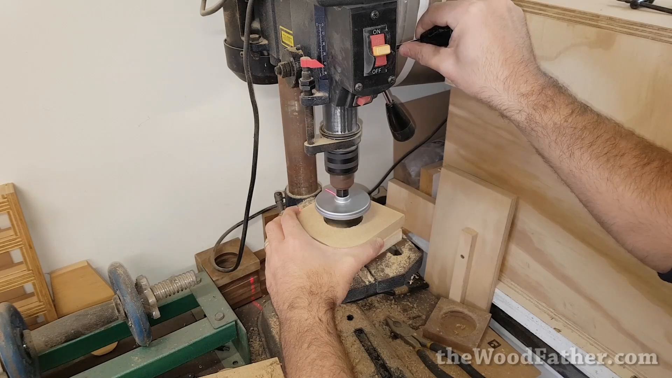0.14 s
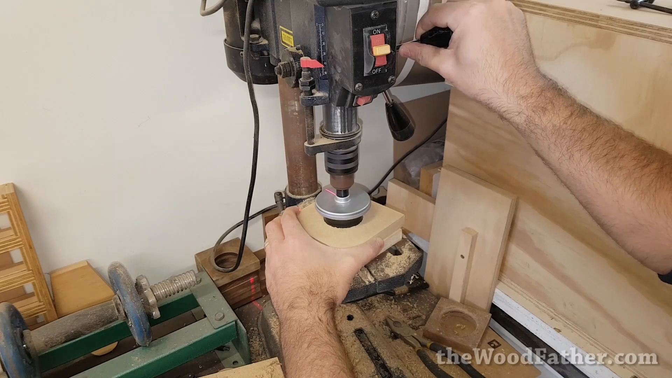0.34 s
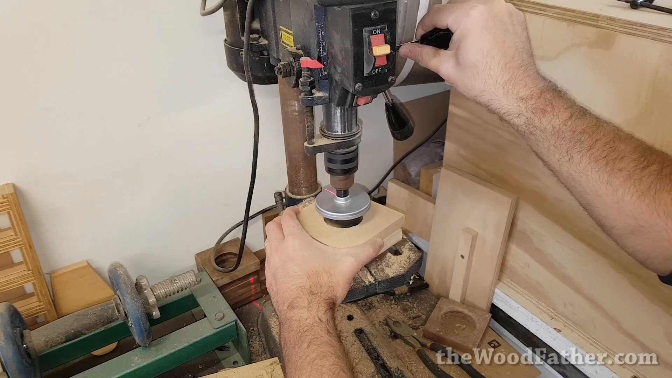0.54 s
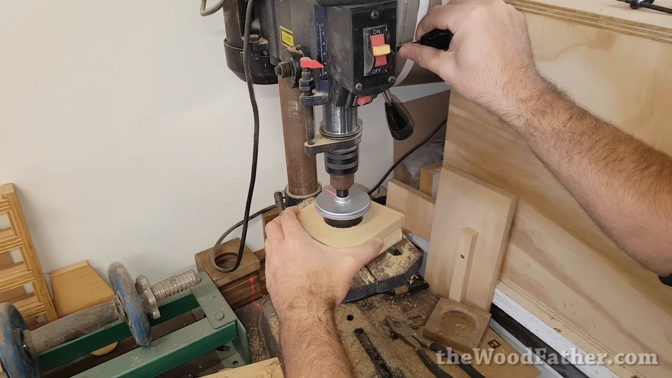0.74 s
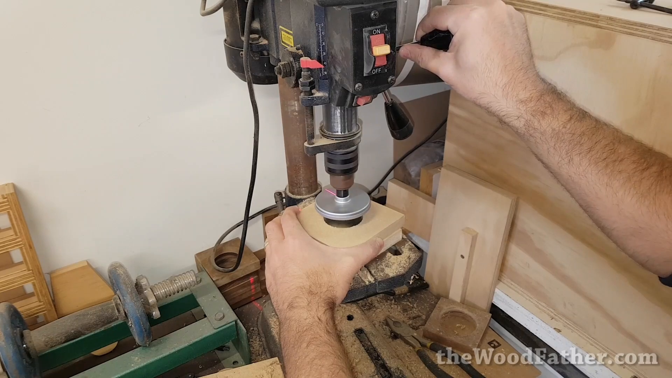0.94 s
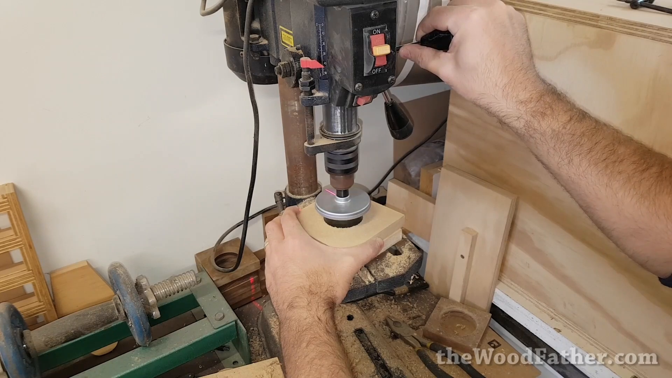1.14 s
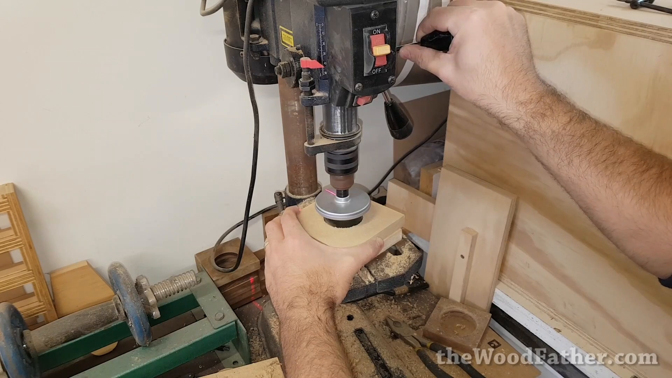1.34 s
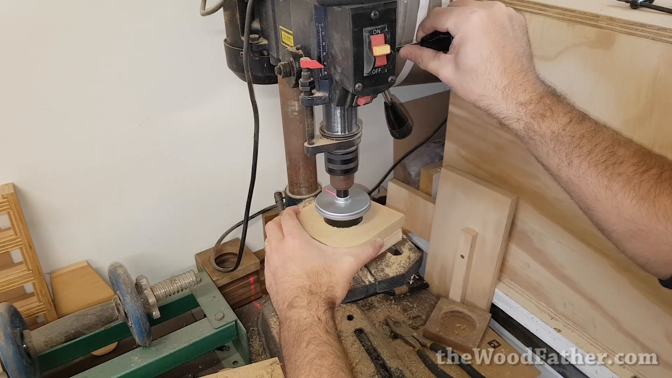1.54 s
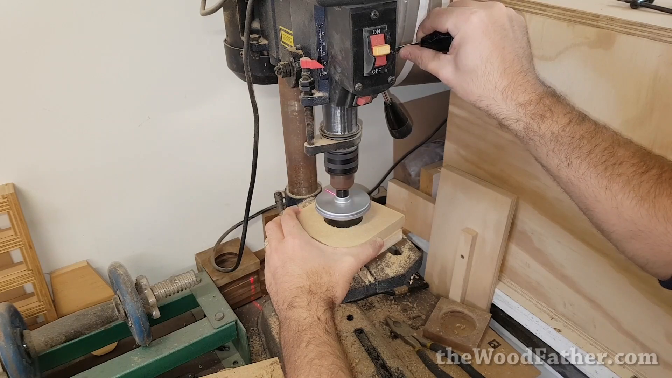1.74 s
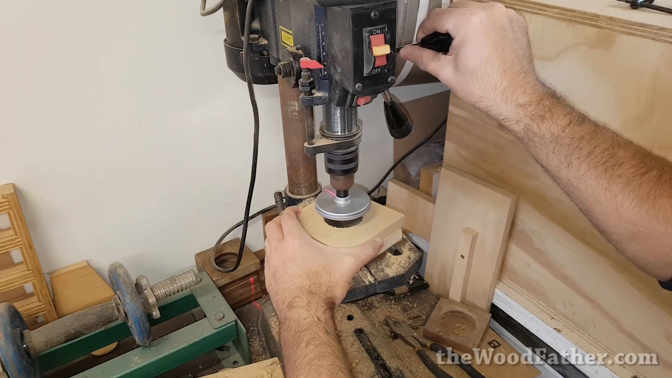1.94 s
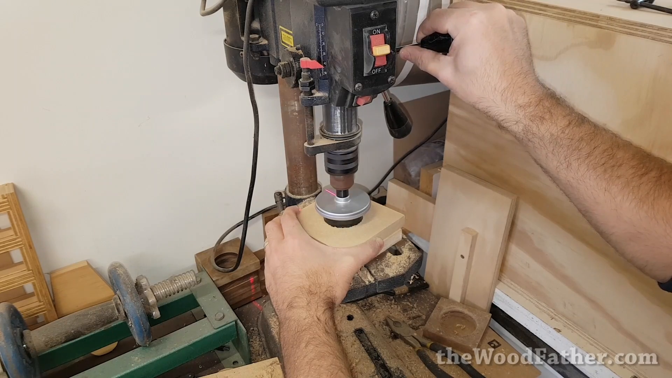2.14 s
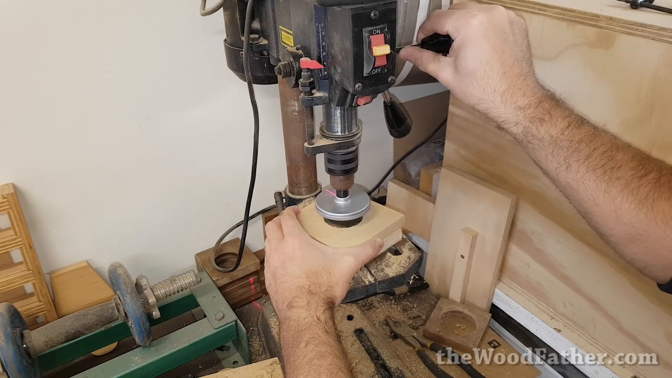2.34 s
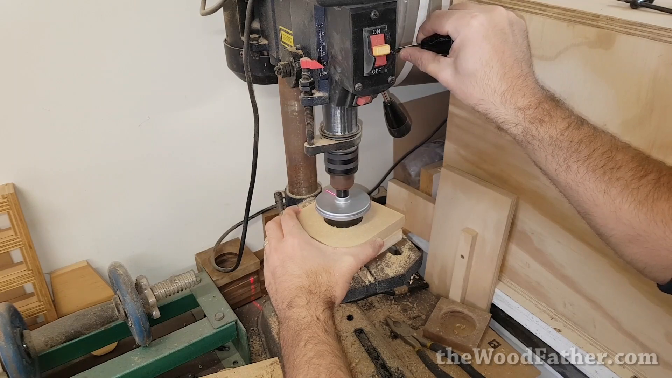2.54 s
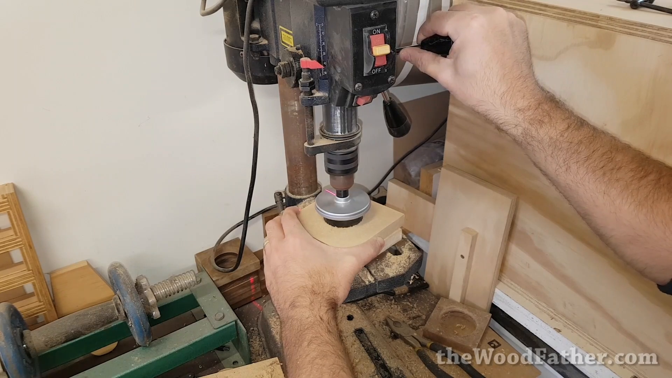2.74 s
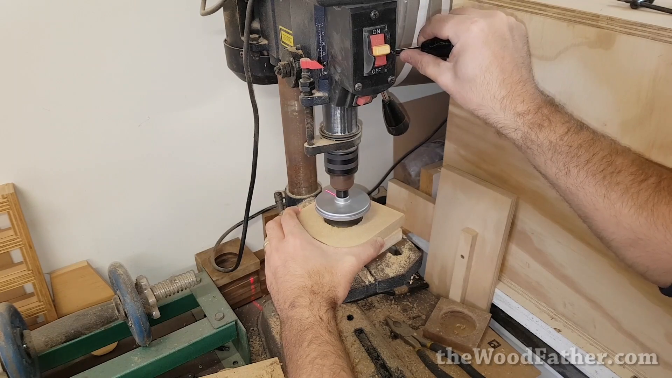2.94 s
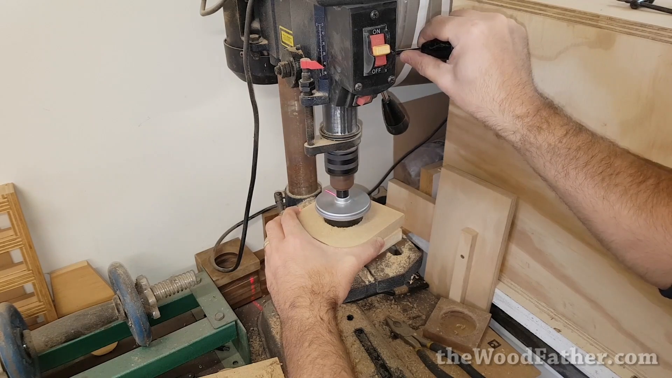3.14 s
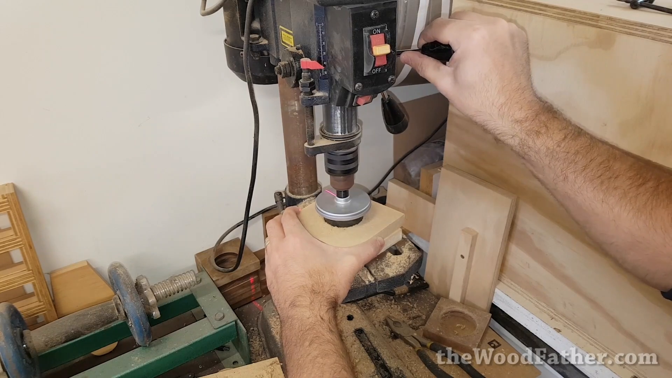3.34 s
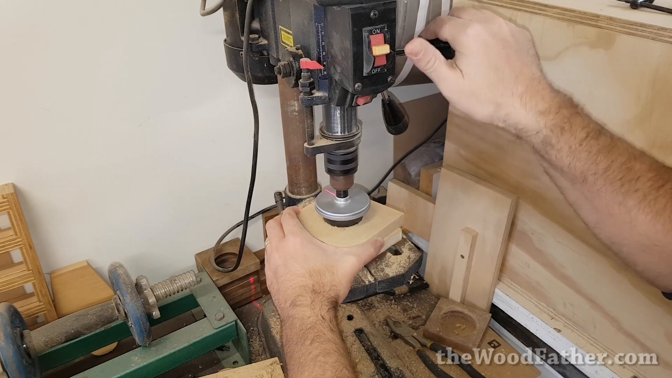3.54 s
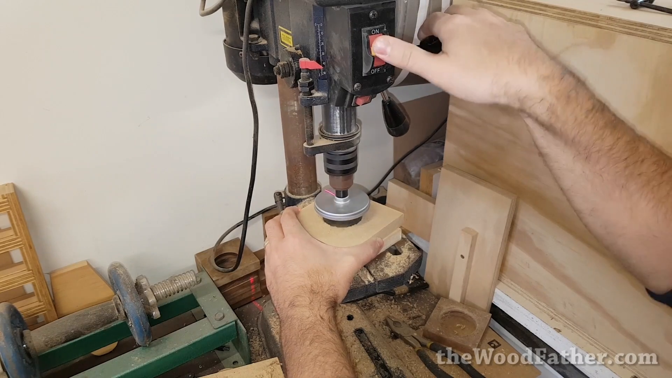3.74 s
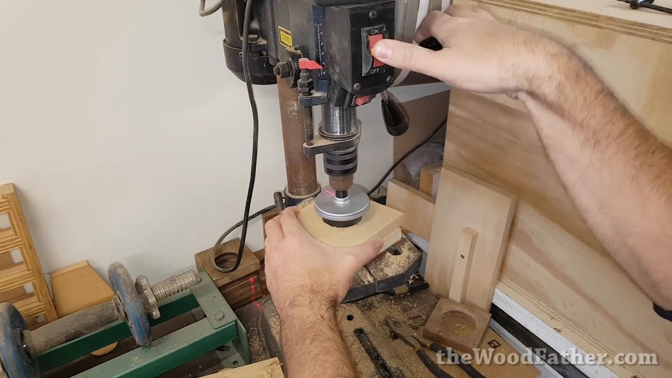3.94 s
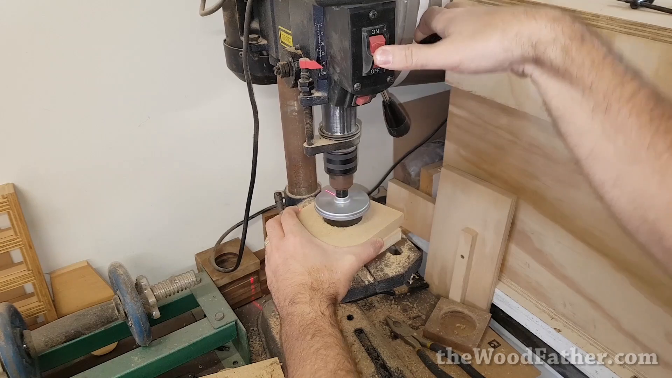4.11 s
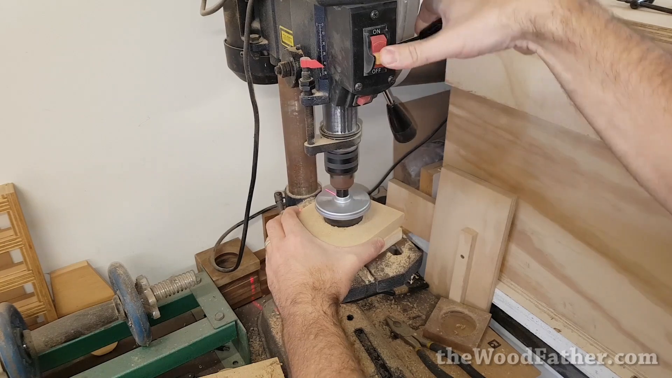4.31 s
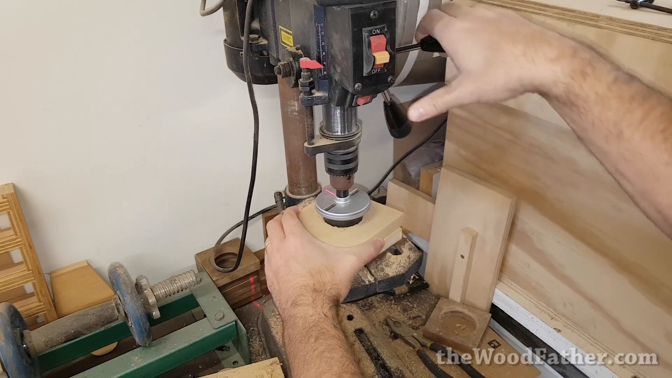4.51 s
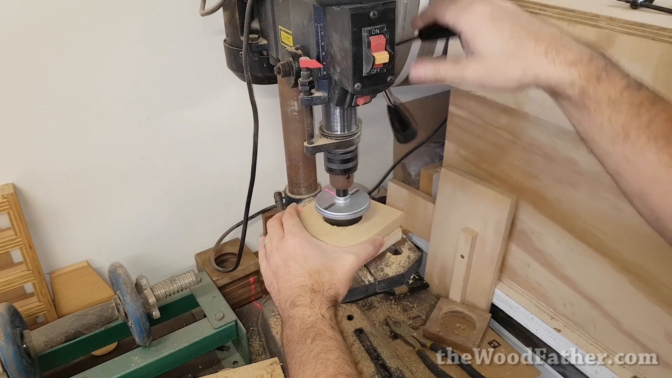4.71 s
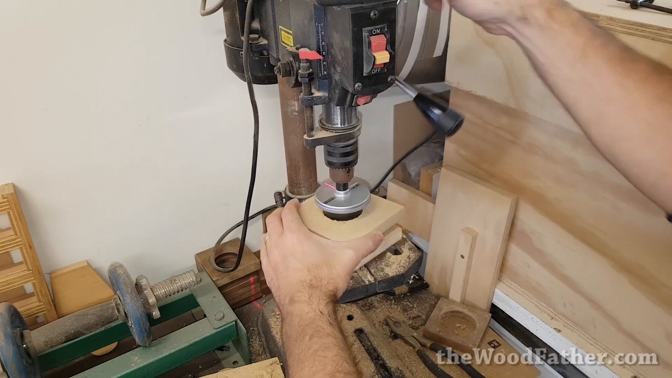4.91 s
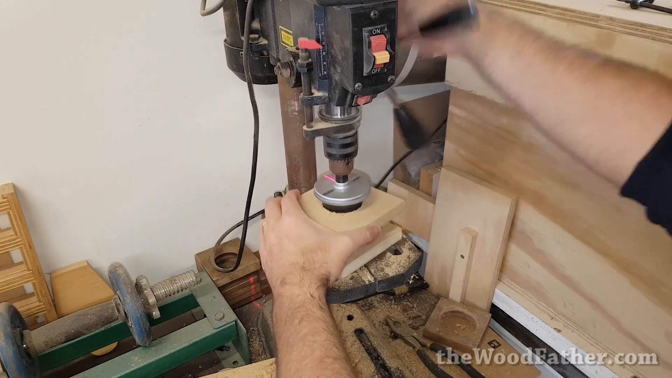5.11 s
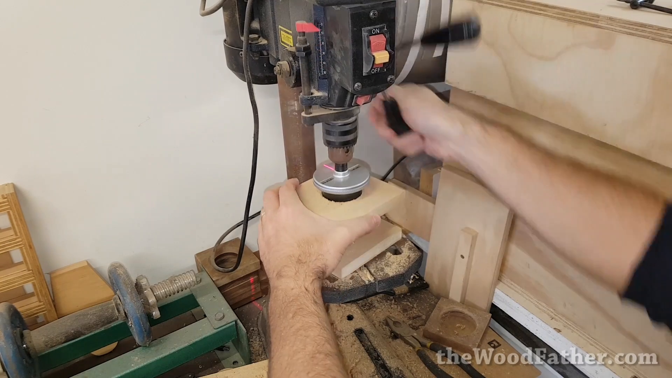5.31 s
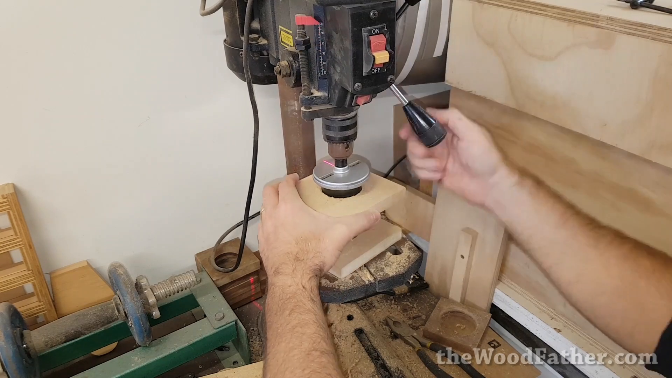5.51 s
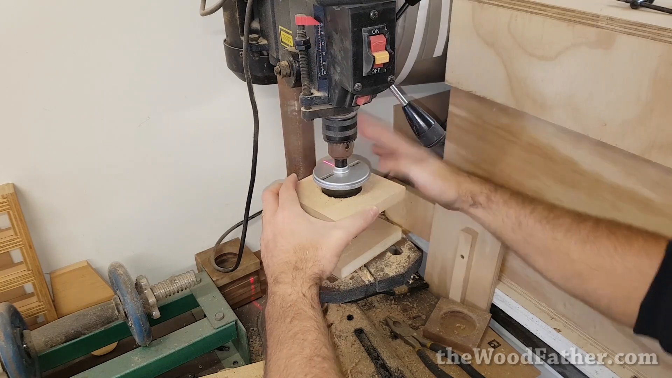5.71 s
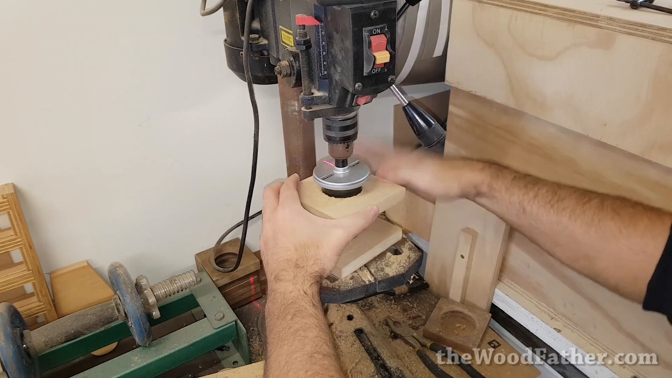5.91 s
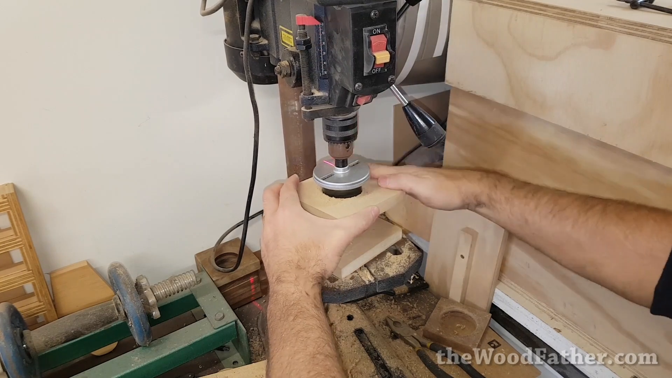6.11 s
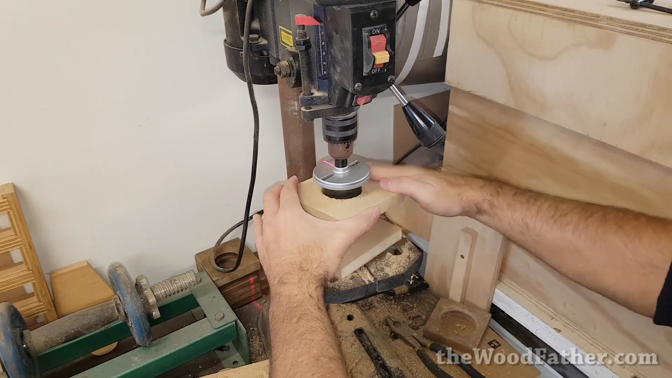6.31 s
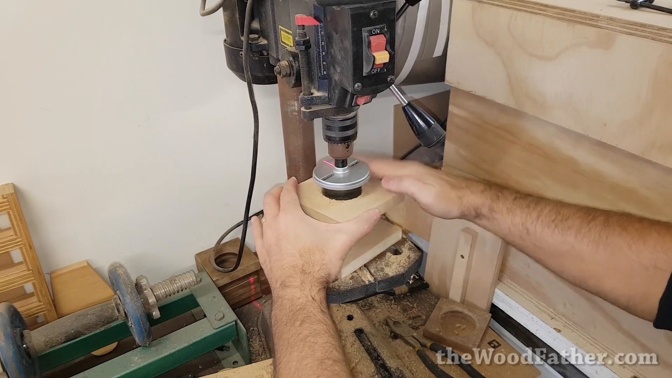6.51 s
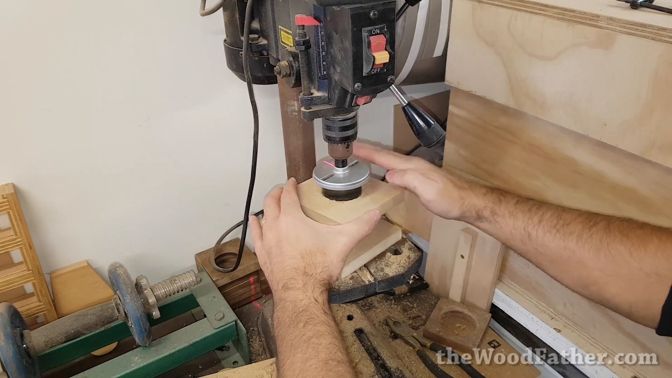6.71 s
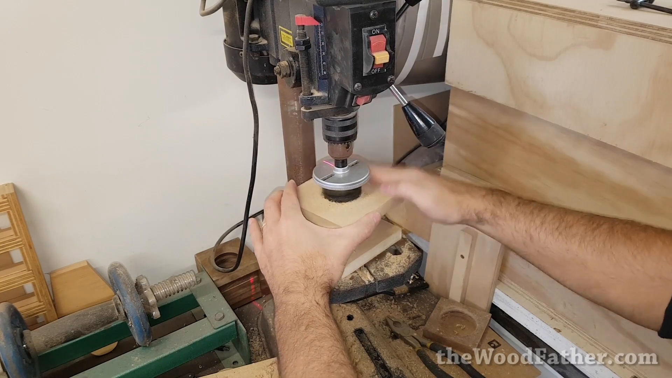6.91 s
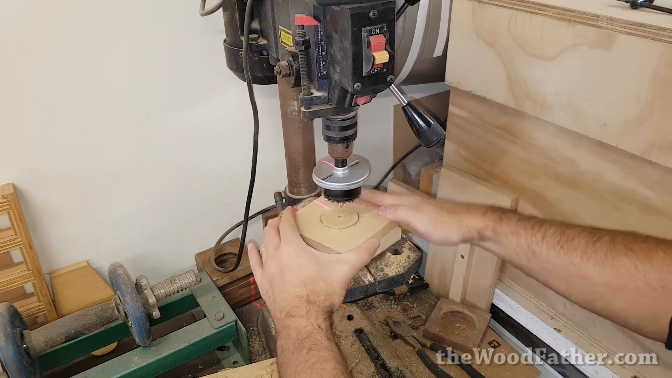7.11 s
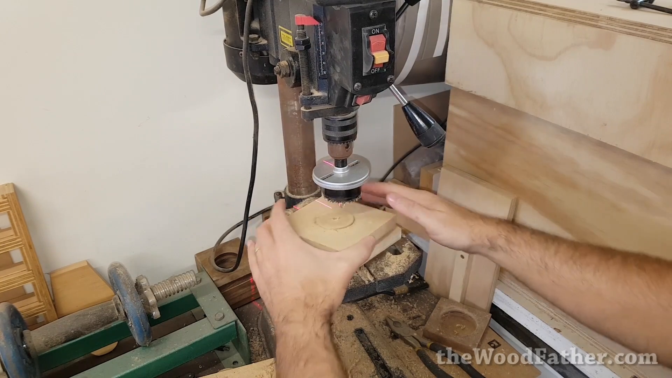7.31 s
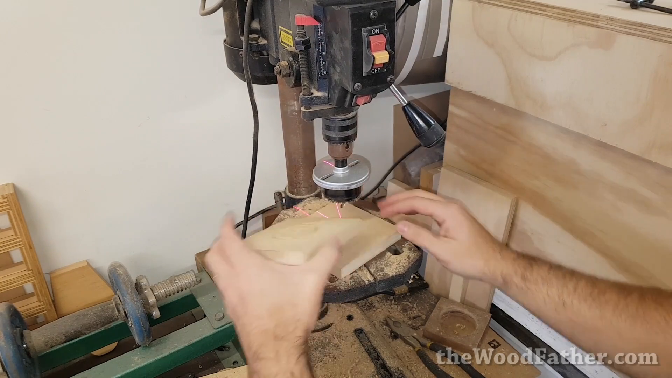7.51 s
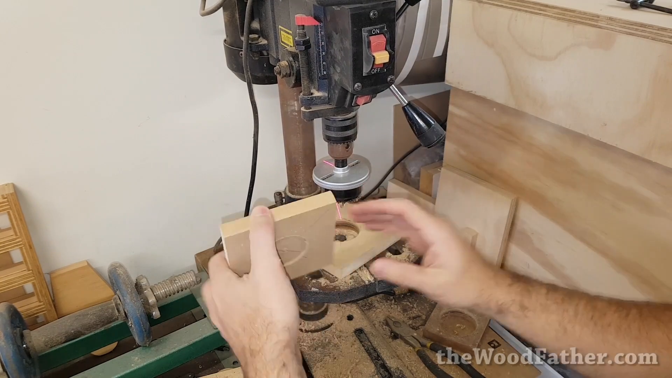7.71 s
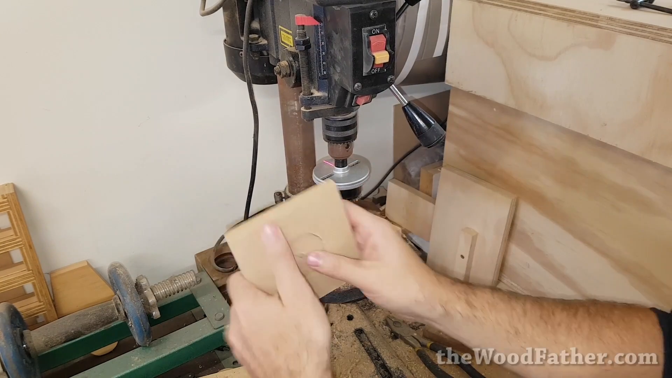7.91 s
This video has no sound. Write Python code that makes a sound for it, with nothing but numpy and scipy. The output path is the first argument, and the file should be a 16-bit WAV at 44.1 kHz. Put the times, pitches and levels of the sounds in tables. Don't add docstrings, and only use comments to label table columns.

```python
import sys
import numpy as np
from scipy import signal
from scipy.fft import rfft, irfft, next_fast_len
from scipy.io import wavfile
from scipy.ndimage import uniform_filter1d, map_coordinates

SR = 44100
rng = np.random.default_rng(int(sys.argv[2]) if len(sys.argv) > 2 else 0)


def ratio(d):
    e = np.asarray(d, float) / 20
    return 10 ** e


def generate_wav(signal):
    frames = np.transpose(np.atleast_2d(signal))
    scaled = np.clip(frames, -1, 1) * 32767
    pcm = np.round(scaled).astype(np.int16)
    wavfile.write(sys.argv[1], SR, pcm)


N = 350595
T = np.arange(N) / SR

BREAKOUT_S, SWITCH_OFF_S, COAST_S, IDLE_END_S = 2.8, 4.134, 0.58, 4.27
LOADED_HZ, FREE_HZ = 176.2, 195.7

# start_s, level_db
FEED = [(0, 3), (.1, 3.5), (.45, 2), (1.17, -1), (1.33, 1), (2.1, -0.5), (2.65, -2.5), (2.76, -3.5),
        (2.82, -7), (3.3, -8), (3.62, -12.5), (3.84, -13.5), (4.15, -13.5)]
# level_db at plain bite, growth_db_per_db of bite, power of speed
PRESS_LAYERS = [
    (-24.5, 0.06, 2.1),
    (-30.5, .6, 2.13),
    (-33, 1, 2.6),
    (-36.5, 0.41, 2.04),
]
# freq_hz, density_db
RUMBLE = [(15, -47), (25, -15), (38, -21.5), (65, -14), (91, -2), (125, -3.5), (188, 7), (330, -15),
          (430, -38.5), (730, -120)]
# freq_hz, density_db
CUT = [(150, -33), (260, -8.5), (430, -7), (506, -6), (565, -4.5), (676, -0.5), (880, -1), (975, -3.5),
       (1080, 0.5), (1230, -4), (2000, -13), (2600, -37), (4400, -120)]
# freq_hz, width_hz, lift_db
BOARD_MODES = [(305.4, 48, 7), (400.5, 28, 7.5), (466, 25, 9), (500, 7.2, 6), (527, 17, 6.5), (620, 20, -1),
               (674, 12, 0.5), (848, 6.2, 1), (1128, 15, 2), (1149, 50, -3.5), (1277, 28, 3.5),
               (1533, 10, 0), (1653, 9.9, 4.5), (1730, 8.4, -10)]
# freq_hz, density_db
RASP = [(940, -43.5), (1600, -6.5), (1780, -8.5), (2260, -6), (3390, -5), (4230, -9.5), (4890, -9.5),
        (5330, -11.5), (7260, -12.5), (8800, -14), (9980, -18), (15100, -21.5), (16000, -35)]
# freq_hz, width_hz, level_db
CUP_MODES = [(3625, 350, 0), (3094, 320, 0)]
# freq_hz, rms_db
LOADED_ORDERS = [(177.6, -31), (323.0, -44.5), (398.4, -43.5), (463.0, -47), (497, -46), (613.7, -49),
                 (673, -48), (851, -52), (1123, -47), (1195, -46), (1280, -47), (1514, -48), (2553, -57)]
# freq_hz, rms_db
FREE_ORDERS = [(95.5, -41), (233, -46.5), (401, -43.5), (499, -50.5)]
# centre_s, rms_db, half_length_s
SURGES = [(0.067, -20, 0.018), (0.26, -26, 0.1), (0.547, -32, 0.0087), (1.325, -28.5, 0.047),
          (1.412, -23.5, 0.022), (1.537, -29, 0.059), (1.825, -25.5, 0.019), (1.901, -27.5, 0.011),
          (1.992, -24, 0.023), (2.196, -33, 0.073), (2.308, -24.5, 0.053), (2.418, -21.5, 0.014),
          (2.53, -29, 0.026), (2.757, -22, 0.028), (3.563, -33, 0.026), (4.072, -34.5, 0.058)]
# start_s, pitch_hz, level_db
SING = [(0, 500, -41), (.3, 500, -35), (.45, 480, -41), (.7, 465, -37), (1.0, 470, -39), (1.2, 500, -40),
        (1.5, 520, -40), (1.9, 500, -40), (2.1, 510, -39), (2.35, 530, -37), (2.6, 490, -38),
        (2.8, 490, -46)]
# centre_s, pitch_hz, level_db, half_length_s
FLARES = [(.2, 672, -39, .2), (.65, 612, -40, .15), (1.35, 684, -39, .25), (.95, 1280, -39, .15),
          (.25, 1200, -40, .15), (.5, 1125, -40, .1), (1.5, 850, -41, .12), (2.33, 1030, -42, .06),
          (1.05, 322, -40, .1), (3.3, 400, -41, .15), (3.87, 405, -40, .06), (3.75, 820, -47, .2),
          (.3, 840, -42, .2), (.2, 1335, -43, .15), (1.8, 1190, -43, .2), (2.0, 780, -44, .15),
          (3.95, 300, -39, .15), (3.9, 520, -43, .15), (.7, 1030, -44, .2)]
# freq_hz, density_db
FLOOR = [(15, -35.5), (25, -2.5), (102, 0.5), (145, -19.5), (256, -2.5), (463, -13), (754, -15),
         (887, -19.5), (9570, -38.5), (13600, -32), (16000, -35)]
# start_s, level_db, pitch_hz
PINGS = [(4.768, -44, 1150), (4.806, -45, 3250), (4.839, -45, 3250), (4.868, -44, 2830), (4.914, -41, 2300),
         (4.925, -46, 3500), (5.011, -48, 3650), (5.048, -44, 3520), (4.896, -36, 3700), (4.752, -43, 1150),
         (5.803, -39, 1320), (5.82, -42, 1350), (3.45, -36, 1300), (7.043, -38, 480), (7.179, -25, 700),
         (5.085, -45, 1900), (5.085, -45, 4650), (5.156, -40, 3600), (4.493, -44, 1800), (4.499, -47, 1200),
         (4.506, -46, 1650), (4.583, -44, 2000), (4.617, -47, 1800), (5.236, -22, 450), (5.143, -27, 450),
         (5.168, -27, 450), (5.435, -47, 5400), (5.084, -39, 3480), (5.113, -39, 3120), (5.137, -42, 3300),
         (5.489, -26, 1880), (5.489, -32, 2650), (3.745, -38, 1500), (6.659, -39, 3150), (6.659, -42, 4200),
         (6.659, -42, 5600), (6.826, -40, 3100), (6.826, -39, 4200), (6.826, -39, 5550), (6.985, -39, 3000),
         (6.988, -40, 1400), (6.858, -30, 260), (7.0560, -14, 3000), (7.0560, -18, 2600), (7.178, -23, 320),
         (7.178, -28, 1100)]
# start_s, level_db, pitch_hz, thud_db, clack_db
KNOCKS = [(3.745, -33, 1480, 3.5, -21), (4.475, -42.5, 1580, 1, -7.5), (4.582, -42, 1960, -5.5, -17),
          (4.614, -50, 1750, -6.5, -16), (5.185, -25.5, 480, -12, -14), (5.224, -26.5, 1920, -11, -12.5),
          (5.234, -33, 480, -12, -15), (5.434, -51.5, 1480, 3, -4), (5.471, -31, 1500, 3.5, -9),
          (5.488, -27, 1930, -6, -3), (5.603, -32, 1780, -7, -7.5), (5.803, -39.5, 1370, -11, -25),
          (5.886, -54, 1220, 9, 1), (6.901, -41.5, 1490, 3, -8), (7.177, -33, 715, -3, -16),
          (7.929, -70, 2000, -1, 9.5)]
# start_s, level_db, sharpness_db, weight_db, thud_delay_s
SLAPS = [(5.812, -40, -3, 6.5, .011), (5.993, -36, 0, 2.5, .012), (6.162, -35.5, -0.5, 1.5, 0.0079),
         (6.327, -33.5, -7, 0.5, .018), (6.491, -38.5, 5.5, 1, .012), (6.659, -35.5, 4, 1.5, .017),
         (6.825, -37, 5.5, -0.5, .012), (6.984, -35.5, 4, -4, 0.01)]
# freq_hz, width_hz, level_db
TABLE_MODES = [(68.1, 42, -7.5), (188, 63, -1), (287, 59, 1.5), (394, 194, -2), (447.5, 40, 1.5),
               (533, 32, -14.5)]
# freq_hz, density_db
SWAY = [(15, -50), (25, -22.5), (48, -0.5), (150, -1), (179, 0), (200, -0.5), (260, -37), (440, -120)]
# start_s, peak_db
BANGS = [
    (4.1551, -7),
    (7.0553, -3),
]
# freq_hz, density_db
SWITCH = [(120, -33.5), (200, 1), (299, -28), (456, 1.5), (722, -3), (1400, -11.5), (1560, -8.5),
          (3560, -16.5), (3830, -10.5), (5940, -23), (9000, -20.5), (12600, -19), (16000, -30)]
# freq_hz, level_db, t60_s
SWITCH_RING = [(412, -6, 0.1), (960, -7, 0.08), (1410, 8, 0.0058), (2900, -7.5, 0.016), (12350, 8, 0.004)]
# freq_hz, density_db
POP = [(65, -42), (110, -19.5), (144, 0), (269, -9), (332, -2), (525, -7), (1090, -9), (1370, -11),
       (1720, -7.5), (7400, -42), (11200, -52), (14700, -54), (16000, -96.5)]
# freq_hz, level_db, t60_s
POP_RING = [(162.6, -9.5, 0.38), (326, -11, 0.12), (453, -10, 0.12), (2062, -11, 0.2), (1108, -4, 0.22),
            (1764, -4, 0.13), (2430, -15, 0.27), (2960, 2, 0.032)]
# start_s, level_db, pitch_hz
TICKS = [(4.156, -19, 11430), (5.4742, -22.5, 2900), (5.611, -35, 1700), (5.619, -38, 2300),
         (5.822, -46, 8000), (5.839, -45, 9000), (5.885, -52, 8980), (6.3268, -36, 4100),
         (6.491, -32, 3150), (6.701, -49, 2990), (6.711, -54, 3000), (6.858, -52, 3000),
         (6.8875, -44, 3000), (6.888, -51, 8000), (6.901, -34.5, 3030), (6.901, -44, 8000),
         (6.913, -40, 3050), (6.913, -44, 10030)]
# start_s, speed_db
RACK = [(4.74, -37), (4.752, -5.5), (4.786, -8), (4.866, -2), (5.0, -8.5), (5.07, -10), (5.176, 2),
        (5.235, 0.5), (5.37, -10)]
# level_db, growth_db_per_db of speed
RACK_LAYERS = [
    (-32, 1),
    (-39, 1.5),
    (-52, 2.5),
]
# freq_hz, density_db
HANDLE = [(47, -55), (80, -29), (117, -9.5), (156, -1), (277, -6), (346, -15), (431, 0.5), (751, -21),
          (839, -13), (1860, -18), (6310, -38.5), (7530, -30), (16000, -47)]
# start_s, ring_db, tick_db, fizz_db
TEETH = [(4.749, -52, -38, -58), (4.805, -40.5, -40, -46), (4.838, -42, -36, -40.5),
         (4.8449, -46, -44, -43), (4.865, -45, -33, -40), (4.870, -48, -34, -41), (4.887, -40, -26, -42.5),
         (4.893, -39, -25.5, -38.5), (4.916, -43, -45, -48.5), (4.976, -39, -57, -62),
         (5.011, -37.5, -48, -62), (5.048, -38, -50, -44), (5.0835, -38, -44, -50),
         (5.1132, -47, -42, -44.5), (5.118, -50, -50, -37), (5.1364, -51, -37, -34.5),
         (5.156, -52, -37, -38), (5.161, -50, -45, -34.5), (5.175, -50, -36, -28.5),
         (5.192, -48, -42, -30.5), (5.207, -50, -42, -30), (5.222, -49, -38, -33.5),
         (5.2572, -37, -22.5, -37)]
# freq_hz, width_hz, level_db
STEEL_MODES = [(4600, 500, -1), (6210, 290, -7.5), (7250, 102, 3.5), (8500, 270, 3), (13600, 1000, -12)]
# start_s, pressure_db
SLIDE = [(7.32, -60.5), (7.418, -63.5), (7.45, -54), (7.514, -55), (7.54, -60), (7.632, -60), (7.67, -80)]
# freq_hz, density_db
GRAIN = [(470, -65), (800, -18), (1320, -14), (1740, -5.5), (1890, -21), (2140, -7.5), (2620, -15),
         (2710, -7), (3020, 0.5), (3890, -17), (5980, -20), (14000, -30.5)]
# freq_hz, t60_s
SHOP = [(100, 0.8), (300, 0.32), (1000, 0.41), (4000, 0.37), (12000, 0.27)]
# freq_hz, correlation
ALIKE = [(60, 1), (150, 0.93), (380, .9), (950, 0.45), (2380, 0.12), (5980, 0.7), (15000, -0.75)]
# freq_hz, left_minus_right_db
LEAN = [(60, -1), (110, -1.5), (190, .8), (360, -2), (650, -1), (1650, -1.5), (4970, -2), (15000, 2.5)]
# freq_hz, left_lead_rad
LEAD = [(0, 0), (700, .05), (1210, 0.3), (1640, 0.81), (3010, -0.1), (3880, 1.5), (4570, 1), (5860, 0.92),
        (8700, 1.5), (10400, 2.4), (11500, 0.5), (12400, -.6), (14000, .6), (16400, .6)]
# freq_hz, left_lead_rad
SAW_LEAD = [(12400, 0), (13100, 0.5), (13700, -6.5), (14500, -6.3)]


def unit(x):
    return x / np.sqrt(np.mean(x ** 2) + 1e-20)


def peak(x):
    return x / np.abs(x).max()


def along(points, hz):
    f, v = np.transpose(points)
    return np.interp(np.log(hz + 1), np.log(f + 1), v)


def curves(rows, fade_s=0.036):
    s, *cols = np.transpose(rows)
    fall = -60 * np.clip((T - s[-1]) / fade_s, 0, 3) - 200 * (T < s[0])
    return [np.interp(T, s, c) + fall for c in cols]


def wobble(rate_hz, size=N):
    knots = rng.standard_normal(int(N * rate_hz / SR) + 400)
    return map_coordinates(knots, [T[:size] * rate_hz])


def filtered(x, response):
    m = 2 * next_fast_len(x.shape[-1] // 2 + 4096)
    return irfft(rfft(x, m) * response(np.fft.rfftfreq(m, 1 / SR)), m)[..., :x.shape[-1]]


def modes(table):
    def response(f):
        total = 0
        for k, (centre_hz, width_hz, db) in enumerate(table):
            damping = 1j * f * width_hz
            total = total + (-1) ** k * ratio(db) * damping / (centre_hz ** 2 - f * f + damping)
        return total
    return response


def band(lo_hz, hi_hz):
    return lambda f: (1j * f / (lo_hz + 1j * f) * hi_hz / (hi_hz + 1j * f)) ** 2


def colour(points, lo_hz=1, hi_hz=20000):
    return lambda hz: ratio(along(points, hz)) * (hz > lo_hz) * (hz < hi_hz)


def causal(points):
    def response(hz):
        cep = irfft(along(points, hz) * np.log(10) / 20)
        cep[1:len(cep) // 2] *= 2
        cep[len(cep) // 2 + 1:] = 0
        return np.exp(rfft(cep))[:len(hz)]
    return response


def rush(gain, patchy_db):
    z = signal.stft(rng.standard_normal((2, N)), nperseg=512)[2]
    field = uniform_filter1d(rng.standard_normal(z.shape[1:]), size=5, axis=0)
    field = uniform_filter1d(field, size=8, axis=1)
    pair = signal.istft(z * ratio(patchy_db * unit(field)), nperseg=512)[1][:, :N]

    def mid_side(hz):
        turn = np.arccos(np.clip(along(ALIKE, hz), 0, 1)) / 2
        return gain(hz) * [np.cos(turn), np.sin(turn)]
    mid, side = filtered(pair, mid_side)
    return unit(np.array([mid + side, mid - side]))


def tone(hz, drift):
    return np.sqrt(2) * np.sin(2 * np.pi * np.cumsum(hz * (1 + drift * wobble(6))) / SR)


def puff(t60_s, rise_s, lag_s=0, click_db=-40):
    t = np.clip(np.arange(SR // 4) / SR - lag_s, 0, 1)
    x = rng.standard_normal(len(t)) * ratio(-60 * t / t60_s) * (1 - np.exp(-t / rise_s))
    x[round(lag_s * SR) + 1] += ratio(click_db)
    return peak(x)


def blow(table, t60_s, rise_s):
    return peak(filtered(puff(t60_s, rise_s, click_db=19.5), lambda f: modes(table)(f) ** 2))


def add(out, s, sound, wet_db):
    hz, t, z = signal.stft(rng.standard_normal((2, SR // 2)), SR, nperseg=256)
    z = z * ratio(-60 * t / along(SHOP, hz)[:, None])
    alike = np.clip(along(ALIKE, hz), 0, 1)[:, None]
    z[1] = alike * z[0] + np.sqrt(1 - alike ** 2) * z[1]
    tail = signal.istft(z, SR, nperseg=256)[1]
    edges = np.unique(np.geomspace(8, len(sound) // 2, 60).astype(int))
    power = np.add.reduceat(np.abs(rfft(sound)) ** 2, edges)[:-1] / np.diff(edges)
    centre_hz = np.sqrt(edges[1:] * edges[:-1]) * SR / len(sound)
    heard = np.transpose([centre_hz, 10 * np.log10(power + 1e-14)])
    echo = filtered(1. * (np.arange(len(sound)) == 130), causal(heard))
    wet = signal.fftconvolve(echo[None], ratio(wet_db) * tail / np.linalg.norm(tail[0]), axes=1)
    wet[:, :len(sound)] += sound
    start = round(s * SR)
    out[:, start:start + wet.shape[1]] += wet[:, :N - start]


def leading(x, lead):
    return filtered(x, lambda hz: np.exp(1j * along(lead, hz) * np.array([[.5], [-.5]])))


def speed_db():
    return 20 * np.log10(np.clip(1 - (T - SWITCH_OFF_S) / COAST_S, 1e-3, 1))


def stroke(s, db, grows_db_s, dies_db_s):
    return db + np.minimum(grows_db_s * (T - s), dies_db_s * (s - T))


def press():
    load = np.clip((BREAKOUT_S - T) / 0.074, 0, 1)
    free = (1 - load) * np.clip((IDLE_END_S + 0.23 - T) / 0.5, 0, 1)
    sound = cutting() + column(np.clip((BREAKOUT_S + 0.105 - T) / .15, 0, 1))
    sound += free * ratio(-54.5) * rush(colour(RUMBLE, 33, 58), patchy_db=0.5)
    sag = 1 + .012 * wobble(1.5)
    sound += orders(LOADED_ORDERS, load, sag, drift=.003, swell_db=4)
    sound += orders(FREE_ORDERS, free, sag, drift=.012, swell_db=1.5)
    return sound


def cutting():
    bite_db = np.interp(T, *np.transpose(FEED))
    rumble_db, board_db, cut_db, rasp_db = (
        db + grows * bite_db + power * speed_db() for db, grows, power in PRESS_LAYERS)
    turn = wobble(17)
    chips = ratio(0.83 * wobble(300))

    def wood(lo_hz, hi_hz):
        return lambda f: colour(CUT, lo_hz, hi_hz)(f) * (1 + np.abs(modes(BOARD_MODES)(f)) ** 1.4)
    sound = ratio(rumble_db - 8.0 + 0.58 * wobble(24)) * rush(colour(RUMBLE), patchy_db=-1.0)
    sound += ratio(board_db - 0.5 + 0.17 * turn) * unit(chips * rush(wood(1, 950), patchy_db=1.65))
    sound += ratio(cut_db + 0.14 + 0.78 * turn) * unit(chips * rush(wood(950, 20000), patchy_db=1.2))
    sound += ratio(rasp_db + 0.12 * turn) * unit(chips * rush(colour(RASP), patchy_db=1.5))
    deep = np.interp(T, (0.63, 3.3), (0, np.pi / 2))
    high, low = (rush(lambda f: np.abs(modes([mode])(f)) ** 2, patchy_db=1.5) for mode in CUP_MODES)
    sound += ratio(rasp_db - 9 + 1.1 * turn) * (np.cos(deep) * high + np.sin(deep) * low)
    return sound


def column(load):
    calm = ratio(-40.5 + 8.5 * load)
    boom = sum(ratio(db) * np.exp(-((T - s) / half_s) ** 2) for s, db, half_s in SURGES)
    stray = 0.0472 * wobble(14) * calm / (calm + 3 * boom)
    hz = (FREE_HZ + (LOADED_HZ - FREE_HZ) * load) * (1 + stray)
    return (calm + boom) * ratio(2.6 * speed_db() + 0.39 * wobble(25)) * tone(hz, drift=0.013)


def orders(lines, gate, sag, drift, swell_db):
    sound = np.zeros(N)
    for hz, db in lines:
        if abs(hz - 185) > 35:
            sound += gate * ratio(db - swell_db + swell_db * wobble(4.5)) * tone(hz * sag, drift)
    return sound


def singing():
    s, hz, db = np.transpose(SING)
    sound = (T < s[-1]) * ratio(np.interp(T, s, db) + 2.5 * wobble(14)) * tone(np.interp(T, s, hz), drift=.008)
    drone = rush(lambda f: np.abs(modes([(LOADED_HZ, 30, 0)])(f)) ** 2, patchy_db=1.5)[0]
    walls = ratio(-44 + 2.6 * speed_db()) * np.clip((BREAKOUT_S + .1 - T) / .15, .3, 1) * drone
    sound = sound + walls * [[1], [-1]]
    for s, hz, db, half_s in FLARES:
        sound += ratio(db + 2.1 * wobble(14)) * np.exp(-((T - s) / half_s) ** 2) * tone(hz, drift=.004)
    return sound


def shop_floor():
    return ratio(-58.5) * rush(colour(FLOOR), patchy_db=2.8)


def pings():
    sound = np.zeros((2, N))
    for s, db, hz in PINGS:
        add(sound, s, ratio(db) * blow([(hz, 380, 0)], t60_s=.016, rise_s=.0004), wet_db=-9)
    return sound


def knocks_and_slaps():
    sound = np.zeros((2, N))
    for s, db, hz, thud_db, clack_db in KNOCKS:
        contact(sound, s, db, hz, thud_db, clack_db, snap_db=clack_db - 18.5,
                brush_db=-41.5, body_db=-11, rebound_db=-27.5, delay_s=0.0022)
    for s, db, sharp_db, weight_db, delay_s in SLAPS:
        contact(sound, s, db, 1600, thud_db=5 + weight_db, clack_db=-3 + 0.51 * sharp_db,
                snap_db=-12 + sharp_db, brush_db=-30.5, body_db=-6.5, rebound_db=-5.5, delay_s=delay_s)
    return sound


def contact(out, s, db, hz, thud_db, clack_db, snap_db, brush_db, body_db, rebound_db, delay_s):
    touch_s, rebound_s = .006, .045

    def force(t60_s, rise_s):
        return puff(t60_s, rise_s, touch_s, click_db=12) + ratio(brush_db) * puff(.05, 0.0024)
    board = modes([(hz, 500, 0), (850, 700, body_db)])
    saw = modes([(2400, 900, -3), (3050, 500, 0), (4300, 1200, -7)])
    iron = modes(TABLE_MODES)
    knock = peak(filtered(force(0.091, 0.0024), lambda f: board(f) * band(300, 2600)(f)))
    clack = peak(filtered(force(0.033, 0.00081), lambda f: saw(f) * band(1500, 4500)(f)))
    snap = peak(filtered(force(0.024, 0.00083), lambda f: band(5000, 13000)(f) ** 2))
    push = puff(0.11, 0.0014, touch_s + delay_s, click_db=20)
    push += ratio(rebound_db) * puff(0.17, .004, touch_s + delay_s + rebound_s, click_db=23)
    push += ratio(-29) * puff(0.33, 0.0053, touch_s)
    thud = peak(filtered(push, lambda f: iron(f) * band(40, 900)(f)))
    hit = knock + ratio(clack_db + 3.0) * clack + ratio(snap_db + 14.0) * snap + ratio(thud_db + 3.5) * thud
    add(out, s - touch_s, ratio(db) * hit, wet_db=-2.5)


def bench():
    def after(s, db, t60_s):
        return (T > s) * ratio(db - 60 * np.abs(T - s) / t60_s)
    sway = (T > SWITCH_OFF_S) * ratio(-37.5 + 0.84 * speed_db())
    sway += ratio(-55 + curves(RACK, fade_s=0.92)[0])
    sway += sum(after(s, db - 14, t60_s=1.84) for s, db, *_ in SLAPS)
    pop_s, pop_db = BANGS[1]
    sway += after(pop_s, pop_db - 49, t60_s=1.7)
    return uniform_filter1d(sway, size=900) * ratio(wobble(23)) * rush(colour(SWAY), patchy_db=-1.5)


def switch_snap():
    bounces = [(0, -11), (.0006, 4), (.0031, -11.5), (.0058, -0.5)]  # s, level_db
    return bang(BANGS[0], SWITCH, SWITCH_RING, bounces, body_t60_s=0.089, body_db=-10, ring_db=0, wet_db=-5.5)


def bang(event, spectrum, ring, bounces, body_t60_s, body_db, ring_db, wet_db):
    force = ratio(body_db + 8.7 * wobble(120, size=SR // 4)) * puff(body_t60_s, 0.00085)
    for s, db in bounces:
        force[round(s * SR)] += ratio(db)
    crack = peak(filtered(force, causal(spectrum)))
    t = np.arange(len(crack)) / SR
    tones = np.zeros(len(t))
    for hz, db, t60_s in ring:
        level = ratio(db - 60 * t / t60_s + 5.2 * wobble(39, size=len(t)))
        tones += level * (1 - np.exp(-t / 0.001)) * np.sin(2 * np.pi * hz * t)
    sound = np.zeros((2, N))
    start_s, peak_db = event
    add(sound, start_s, ratio(peak_db) * (crack + ratio(ring_db) * peak(tones)), wet_db)
    return sound


def ticks():
    sound = np.zeros((2, N))
    for s, db, hz in TICKS:
        metal = modes([(hz, .3 * hz, 0), (1.45 * hz, .5 * hz, -8)])
        click = filtered(puff(.012, .0003, click_db=5), lambda f: metal(f) ** 2)
        add(sound, s, ratio(db) * peak(click), wet_db=-10)
    return sound


def quill():
    rise_db, = curves(RACK, fade_s=0.96)
    low_db, mid_db, high_db = (db + grows * rise_db for db, grows in RACK_LAYERS)
    grit = ratio(0.87 * wobble(60))
    sound = ratio(low_db) * unit(grit * rush(colour(HANDLE, 80, 700), patchy_db=1.5))
    scrape = ratio(3.4 * wobble(150)) * grit * rush(colour(HANDLE, 700, 5100), patchy_db=1)
    sound += ratio(mid_db) * unit(scrape)
    sound += ratio(high_db) * rush(colour(HANDLE, 5000), patchy_db=1)
    for s, ring_db, tick_db, fizz_db in TEETH:
        add(sound, s, tooth(s, ring_db, tick_db, fizz_db), wet_db=-3.5)
    return sound


def tooth(s, ring_db, tick_db, fizz_db):
    tense_hz, slack_hz, slacken_s = 1830, 996, 0.218
    hz = slack_hz + (tense_hz - slack_hz) * np.exp(-(s - RACK[0][0]) / slacken_s)
    pawl = ratio(-40 + 2.2 * (fizz_db + 28.5)) * blow([(7300, 90, 0)], 0.043, .0005)
    ring = blow([(hz, 90, 0)], 0.052, 0.0008)
    ring += ratio(-15) * blow([(min(2 * hz, 3550), 250, 0)], 0.025, .0006)
    tick = blow([(2430, 1130, 8.1), (3900, 1500, 6.1)], 0.042, 0.00036)
    fizz = peak(filtered(puff(0.028, 0.00016, click_db=6.5),
                         lambda f: (modes(STEEL_MODES)(f) + 0.33) * band(3500, 16000)(f) ** 2))
    return ratio(ring_db) * ring + ratio(tick_db) * tick + ratio(fizz_db) * fizz + pawl


def slide():
    drag_db, = curves(SLIDE)
    twist_db = stroke(6.905, -53, grows_db_s=70, dies_db_s=110)
    squeak_db = stroke(7.64, -65, grows_db_s=51, dies_db_s=900) - 200 * (T < SLIDE[2][0])
    grain = unit(ratio(1.66 * wobble(62)) * rush(colour(GRAIN), patchy_db=1.5))
    scrape = (ratio(drag_db) + (T > SLAPS[6][0]) * ratio(twist_db)) * grain
    squeak = ratio(1.5 * wobble(40)) * tone(1250, drift=.008)
    return scrape + ratio(squeak_db) * squeak


def board_pop():
    bounces = [(0, 2), (.0021, -3), (.0043, -1), (.0072, -3), (.0105, -3.5), (.02, -6.5)]  # s, level_db
    return bang(BANGS[1], POP, POP_RING, bounces, body_t60_s=0.1, body_db=-13.0, ring_db=-9.5, wet_db=.5)


def scene():
    machine = leading(press(), SAW_LEAD) + singing() + shop_floor()
    hands = pings() + knocks_and_slaps() + bench() + switch_snap() + ticks() + quill() + slide() + board_pop()
    return machine + hands * ratio(-.7 * np.array([[.5], [-.5]]))


def top_cut(x):
    return signal.sosfilt(signal.butter(12, 15950, fs=SR, output="sos"), x)


def record(dry):
    def response(hz):
        return ratio(along(LEAN, hz) * np.array([[.5], [-.5]])) / (1 + (hz / 16500) ** 40)
    ports = filtered(leading(dry, LEAD), response)
    return top_cut(ports)


dry = scene()
out = record(dry)
generate_wav(out)
```